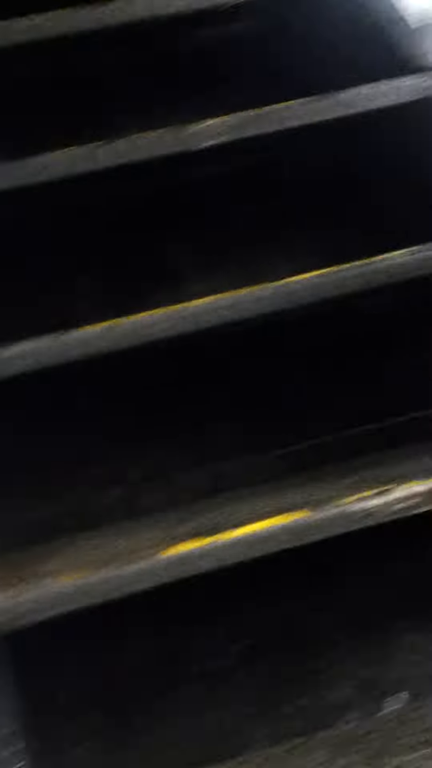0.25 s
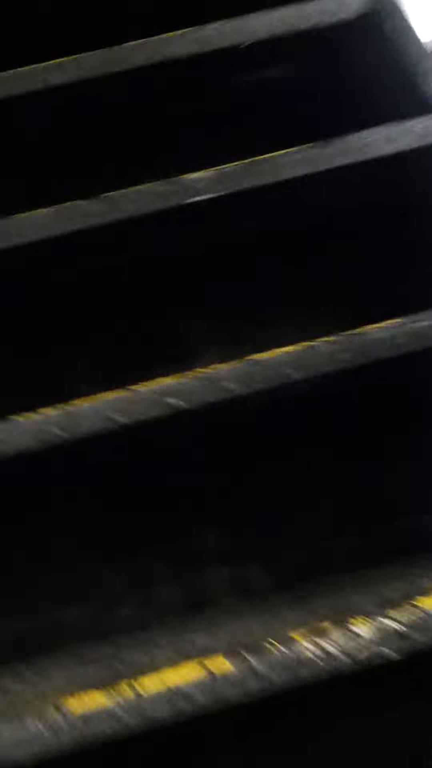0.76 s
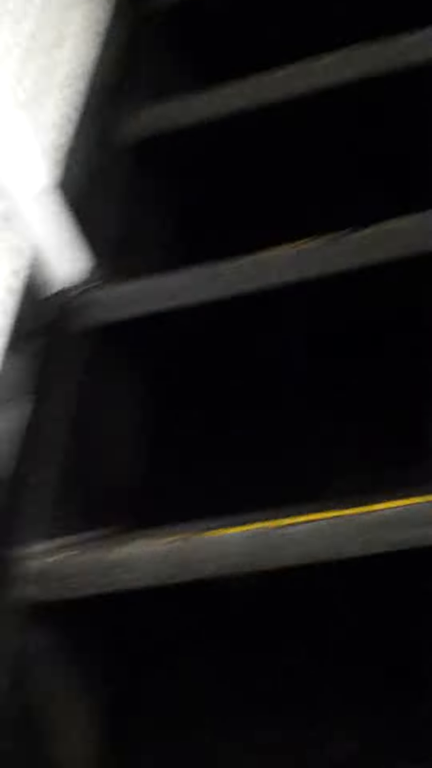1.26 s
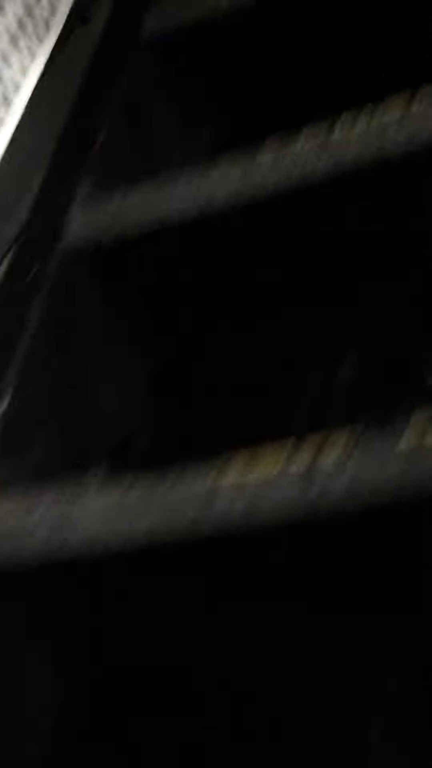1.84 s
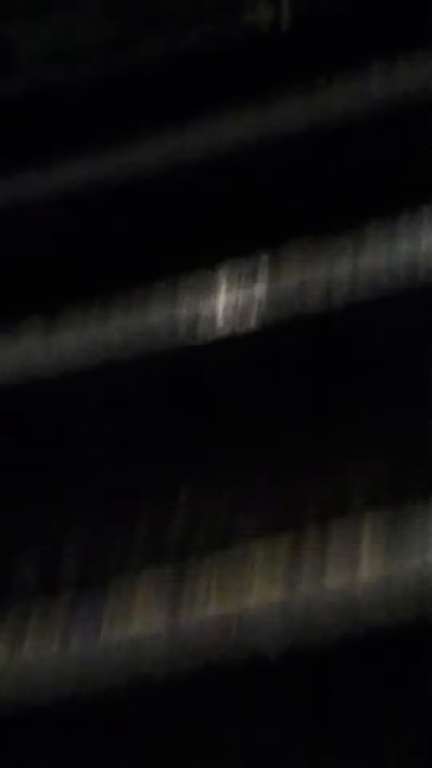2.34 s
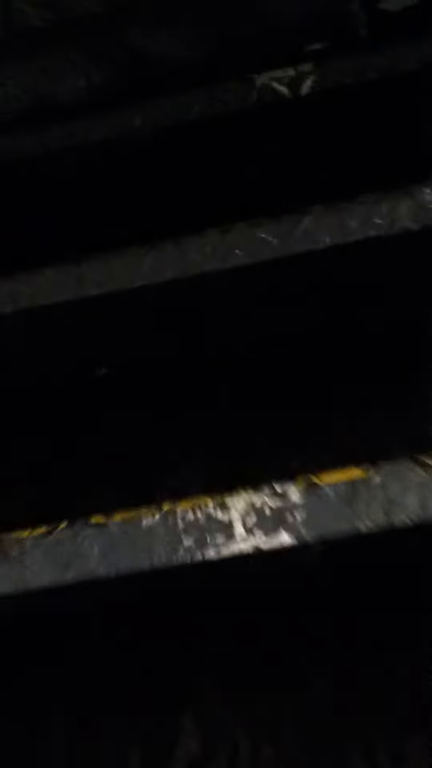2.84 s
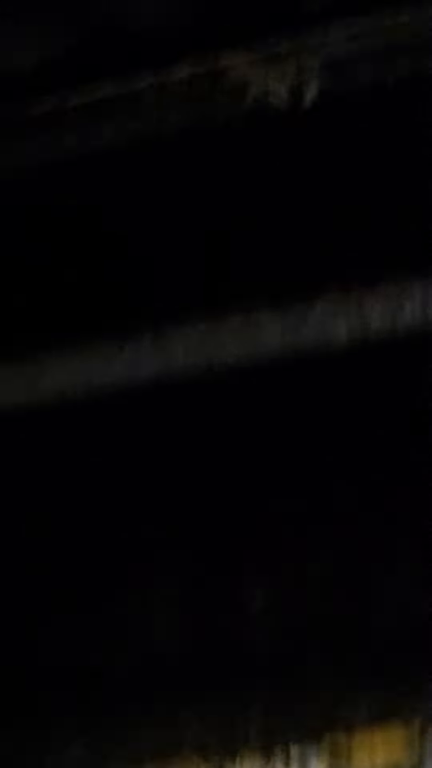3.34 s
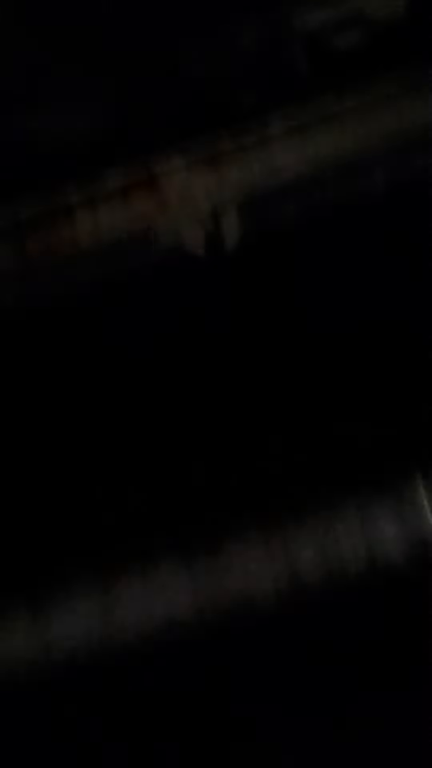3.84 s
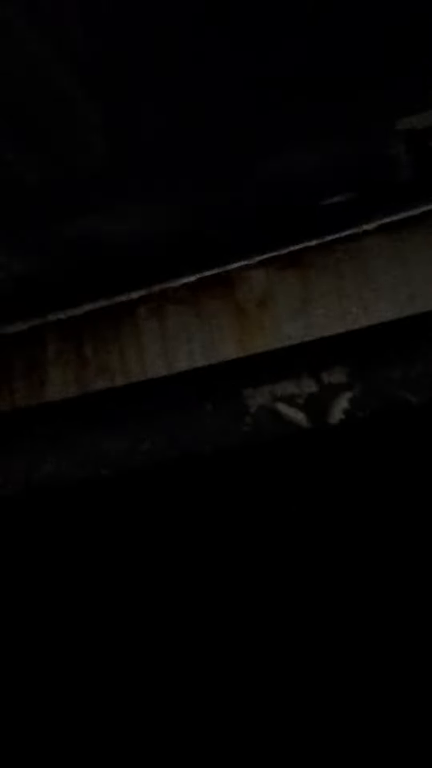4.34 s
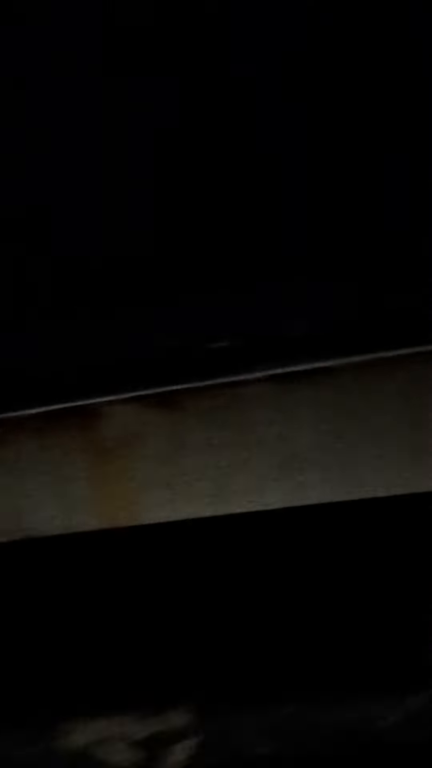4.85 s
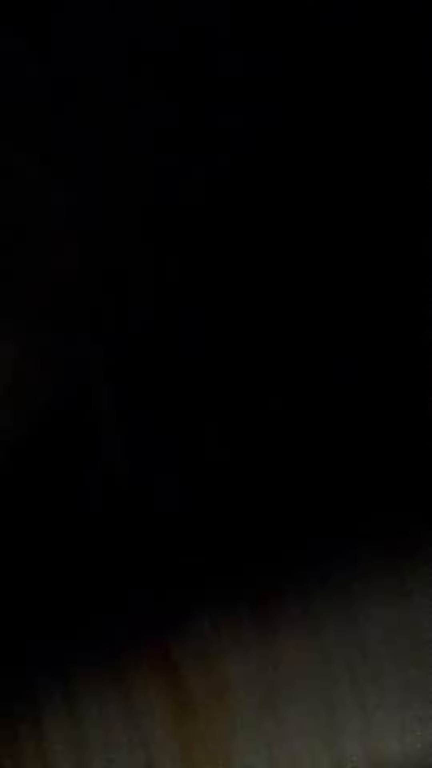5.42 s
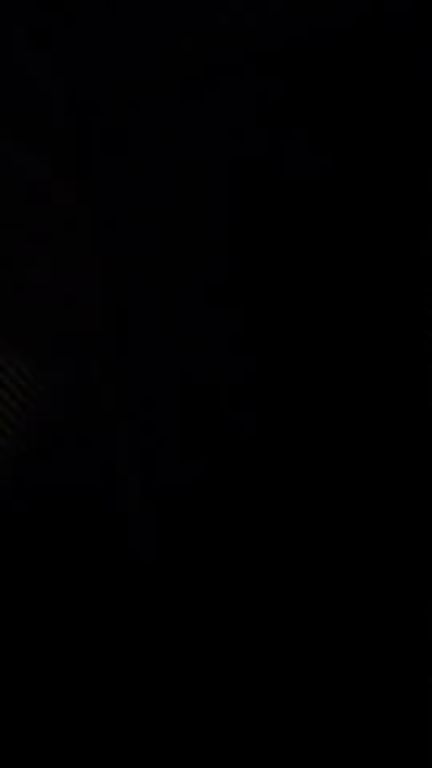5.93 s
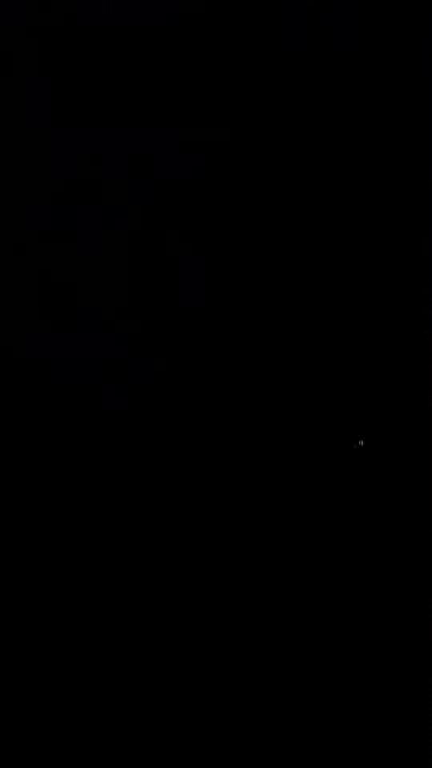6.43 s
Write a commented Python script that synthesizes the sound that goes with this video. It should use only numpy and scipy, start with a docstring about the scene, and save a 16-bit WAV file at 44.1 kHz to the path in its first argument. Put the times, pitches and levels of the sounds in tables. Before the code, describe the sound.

Slow footsteps climb ringing steel stairs on a ship over a low engine drone, with cloth rustle, handling rasps and gritty scuffs.

```python
"""Night climb up a ferry's steel stairs

Someone climbs the stairs with a phone in one hand, over an engine drone of shaft orders and shaped-noise air.
Clothes rustle as dense random slips; a sleeve rasps over the phone, amid dull damped knocks.
Footfalls thud as noise bursts and ring each tread as decaying modes; scuffs crunch and squeak.
Toward the top the fans whine louder, as wavering sines."""
import sys
import numpy as np
from scipy import signal
from scipy.fft import rfft, irfft, next_fast_len
from scipy.io import wavfile
from scipy.ndimage import uniform_filter1d

SR = 44100
rng = np.random.default_rng(int(sys.argv[2]) if len(sys.argv) > 2 else 0)


def transcribe(signal):
    """Save signal, clipped to [-1, 1], as a 16-bit WAV file at the path in sys.argv[1]."""
    frames = np.atleast_2d(signal).T
    limited = np.clip(frames, -1, 1)
    pcm = np.round(limited * 32767).astype(np.int16)
    wavfile.write(sys.argv[1], SR, pcm)


N = 294716
T = np.arange(N) / SR  # time [s]


def undb(db):
    """Decibels to gain."""
    return 10 ** (np.asarray(db) / 20)


def unit(x):
    """Scale to rms 1."""
    return x / np.sqrt(np.mean(x ** 2))


def curve(rows):
    """Join (time [s], value) rows by straight lines."""
    return np.interp(T, *np.transpose(rows))


def colour(x, spectrum):
    """Shape a sound by (frequency [Hz], level [dB]) points, joined over log frequency; rms 1."""
    hz, db = np.transpose(spectrum)
    size = next_fast_len(N)
    f = np.maximum(np.arange(size // 2 + 1) * SR / size, 1)
    gain = undb(np.interp(np.log(f), np.log(hz), db))
    return unit(irfft(rfft(x, size) * gain, size)[:N])


def noise():
    """White noise."""
    return rng.standard_normal(N)


def walk(rate):
    """Random levels held 1 / rate s and slewed twice; spread near 1."""
    k = int(SR / rate)
    held = np.repeat(rng.standard_normal(N // k + 1), k)
    return np.sqrt(2) * uniform_filter1d(uniform_filter1d(held, k), k)[:N]


def tone(hz, waver_hz):
    """A sine whose pitch wavers a little."""
    return np.sin(2 * np.pi * np.cumsum(hz + waver_hz * walk(14)) / SR)


def fade(start, t60, attack):
    """Envelope of a blow: quick rise, exponential decay."""
    age = np.maximum(T - start, 0)
    return (1 - np.exp(-age / attack)) * undb(-60 * np.minimum(age / t60, 2))


def hold(start, end, attack, release):
    """Envelope of a contact: rises, holds to the end time, dies away."""
    return np.clip((T - start) / attack, 0, 1) * np.exp(-np.clip((T - end) / release, 0, 20))


def slide(peak, rise, fall):
    """Envelope of a slide: swells quickly to its peak and dies away."""
    age = T - peak
    return np.exp(-np.minimum(np.where(age < 0, (age / rise) ** 2, age / fall), 20))


# a tread rings sharp at first and sags as it takes the weight: time constant [s]
SAG_S = 0.028


def ring(start, hz, t60, attack, sag=0):
    """One decaying mode; it may begin sharp, by a share of its pitch, and sag to that pitch."""
    age = np.arange(min(int(t60 * SR), N)) / SR
    cycles = hz * (age + sag * SAG_S * (1 - np.exp(-age / SAG_S)))
    level = (1 - np.exp(-age / attack)) * np.exp(-np.log(1000) * age / t60)
    out, first = np.zeros(2 * N), int(np.clip(start * SR, 0, N))
    out[first:first + len(age)] = np.sin(2 * np.pi * cycles) * level
    return out[:N]


def friction(rate, spread_db, grip_db):
    """Dense slips of uneven size, bunched as the contact grips and lets go; rate in slips per second."""
    size = noise() * undb(spread_db * np.minimum(rng.exponential(size=N), 4))
    slips = (rng.random(N) < rate / SR) * size
    return slips * undb(grip_db * walk(170))


def snags(rate, jitter_db, spread_db):
    """A surface catches and lets go: a stuttering run of single clicks, near rate per second."""
    catches = np.floor(np.cumsum(rate * undb(jitter_db * walk(300))) / SR)
    return np.diff(catches, prepend=0) * undb(spread_db * noise())


def reflect(x, t60, wet_db):
    """Close hard surfaces add a dense, short echo that combs the spectrum but keeps its broad colour."""
    age = np.arange(2 * int(SR * t60) + 2) / SR
    tail = rng.standard_normal(len(age)) * np.exp(-np.log(1000) * age / t60)
    echo = unit(tail) / np.sqrt(len(age))
    comb = 1 + undb(wet_db) * rfft(echo)
    comb /= np.sqrt(uniform_filter1d(abs(comb) ** 2, size=41))
    return signal.oaconvolve(x, irfft(comb)[:len(age) // 2])[:N]


# engine shaft rate [turns per second]; level of its fifth order against the fourth [dB]
SHAFT_HZ, FIFTH_DB = 26.82, -14
# the drone's orders swell and dip separately along the stairs:
# (time [s], third order level [dB], fourth order level [dB])
ENGINE_DRONE = [(0, -31.5, -38), (0.699, -34, -45), (1.05, -33.5, -32), (1.65, -33, -31.5),
                (2.25, -32.5, -28.5), (2.6, -32.5, -31.5), (2.9, -29, -25), (3.399, -29.5, -27.5),
                (4.1, -28, -25.5), (4.65, -29, -30), (4.95, -32, -26.5), (5.6, -32.5, -29.5),
                (6.68, -29, -29.5)]
# low hums, and faint high lines near the treads' ringing pitches:
# (frequency [Hz], level before wavering [dB rms])
HUM_LINES = [(47.3, -49.5), (62, -47), (87, -43), (115, -50.5), (480, -46.5), (966, -60.5), (1281, -61.5)]


def engines(turns, hums_follow=0.34, waver=.0016):
    """Orders three to five of one shaft drone together; separate hum lines waver beside them."""
    times, third_db, fourth_db = np.transpose(ENGINE_DRONE)
    third, fourth = np.interp(T, times, third_db), np.interp(T, times, fourth_db)
    drone = hums = 0
    for order, db in zip(range(3, 6), (third, fourth, fourth + FIFTH_DB)):
        wave = np.sin(2 * np.pi * (order * turns + rng.random()))
        drone = drone + undb(db + 0.94 * walk(6.5)) * wave
    for hz, db in HUM_LINES:
        hums = hums + undb(db + 2.1 * walk(3.88)) * tone(hz, 1.0 + waver * hz)
    # the hums partly follow the fourth order's swells and dips
    return np.sqrt(2) * (drone + hums * undb(hums_follow * (fourth - fourth.mean())))


# ventilation and hull rumble: (frequency [Hz], relative level per Hz [dB])
AIR_SPECTRUM = [(25, -29), (40, -16.5), (50, 2), (100, 1), (160, -1.5), (240, -5), (400, -8.5), (650, -9.5),
                (850, -17.5), (1100, -21.5), (1350, -21.5), (2000, -32.5), (2900, -49), (6300, -43),
                (8500, -84.5), (15000, -79)]
# the ventilation opens up near the top of the stairs: (time [s], ventilation and rumble level [dB])
AIR_LEVEL = [(0, -29.5), (1.2, -31), (5.65, -29), (6.05, -28), (6.68, -26.5)]


def ventilation(turns, throb_db=-0.4, order=3):
    """Air and hull rumble; the air flutters, throbs with the engine and rings between the steel walls."""
    roar = colour(noise(), AIR_SPECTRUM)
    rumble = signal.sosfiltfilt(signal.butter(2, 400, fs=SR, output="sos"), roar)
    air = reflect(roar - rumble, t60=0.43, wet_db=-6.0)
    throb = throb_db * np.sin(2 * np.pi * order * turns + walk(15))
    moving_rumble = rumble * undb(walk(8.9))
    moving_air = air * undb(.5 * walk(16) + throb)
    return (moving_rumble + moving_air) * undb(curve(AIR_LEVEL))


# fans on the upper deck: (frequency [Hz], level before the climb's gain [dB rms])
FAN_WHINE = [(453, -44), (791, -59.5), (1238, -60), (1626, -60), (1760, -63), (2196, -61.5)]
# they are screened lower down the stairs: (time [s], gain [dB])
FAN_LEVEL = [(0, -12.5), (5.1, -7.5), (5.55, -3), (6.68, 1.5)]


def deck_fans(waver_hz=2.0, flutter_db=1.0):
    """The upper deck's fans whine in wavering sines that grow louder toward the top of the stairs."""
    whine = sum(undb(db + flutter_db * walk(7.2)) * tone(hz, waver_hz) for hz, db in FAN_WHINE)
    return np.sqrt(2) * whine * undb(curve(FAN_LEVEL))


# colour of the steady rustle: (frequency [Hz], relative level per Hz [dB])
CLOTH_SPECTRUM = [(500, 1.5), (1400, 11.5), (2400, 1.5), (3700, 3.5), (5600, 2.5), (6600, 2.5),
                  (8300, -25.5), (15000, -50.5)]
# clothes moving with the climb: (time [s], level before flutter [dB])
RUSTLE_LEVEL = [(0, -49.5), (.85, -41.5), (1.03, -45.5), (1.2, -52), (1.95, -46.5), (2.14, -45),
                (2.21, -55.5), (2.3, -46.5), (2.55, -48.5), (2.75, -58), (2.92, -48.5), (3.05, -58),
                (3.9, -55.5), (4.15, -44), (4.5, -54.5), (6.68, -53.5)]
# colour of the swishes: (frequency [Hz], relative level per Hz [dB])
SWISH_SPECTRUM = [(800, -10), (2400, -6.5), (3700, 5), (5600, 7), (6800, 7), (8500, -10), (12000, -8.5),
                  (15000, -17.5)]
# swishes of cloth: (time of the peak [s], relative level [dB], rise [s])
CLOTH_SWISHES = [(0.098, -47, 0.015), (0.909, -48.5, 0.018), (1.025, -64, 0.063), (1.48, -74, 0.0039),
                 (1.63, -75, 0.012), (1.960, -45.5, 0.0027), (2.257, -45.5, 0.0084), (2.440, -75, 0.0087),
                 (3.486, -45, 0.016), (4.118, -45, 0.0095), (4.26, -47, 0.0062), (4.754, -54.5, 0.02),
                 (5.255, -47, 0.0062), (5.946, -45.5, 0.0089), (6.11, -42, 0.017), (6.306, -43, 0.0046)]


def clothes(linger=2.43, swish_db=2):
    """Dense slips of cloth rustle through the climb and swish, dying more slowly than they swell."""
    rustle = colour(friction(rate=10000, spread_db=-0.5, grip_db=1.5), CLOTH_SPECTRUM)
    rustle = rustle * undb(curve(RUSTLE_LEVEL) + 3.4 * walk(45))
    weave = colour(friction(rate=9000, spread_db=2.5, grip_db=0.9), SWISH_SPECTRUM)
    swing = sum(undb(db + swish_db) * slide(s, rise, linger * rise) for s, db, rise in CLOTH_SWISHES)
    return rustle + weave * swing


# small dry ticks: (time [s], peak level of the snap [dB], frequency [Hz])
DRY_TICKS = [(0.087, -22.5, 1455), (0.452, -17.5, 3040), (0.644, -7.5, 5130), (0.692, -9.5, 5400),
             (0.714, -10.5, 3200), (0.721, -12, 1680), (2.771, -32, 2180), (2.82, -26, 1450),
             (3.139, -29, 1800), (3.274, -25, 1700), (3.555, -22.5, 784), (6.366, -24, 700),
             (6.422, -22, 646), (6.577, -19, 4400), (6.588, -10, 5700)]
CRACKLE_S = 0.00027  # effective length of a tick's crackle before its gain [s]


def ticks(crackle_db=-8):
    """Each tick is a band-limited snap and a few milliseconds of crackle around the same pitch."""
    out = np.zeros(N)
    for start, db, hz in DRY_TICKS:
        band = signal.butter(3, [hz / 2, min(hz * 1.26, SR / 3)], "band", fs=SR, output="sos")
        # the tiny offset keeps the filter clear of vanishingly small numbers
        snap = signal.sosfilt(band, 1e-18 + (np.arange(N) == int(start * SR)))
        crackle = signal.sosfilt(band, noise() * fade(start, t60=0.0084, attack=0.00038))
        crackle = unit(crackle) * np.sqrt(CRACKLE_S * SR / N)
        out += undb(db) * (snap / abs(snap).max() + undb(crackle_db) * crackle)
    return out


# dull thud, shared by knocks, fumbles and footfalls: (frequency [Hz], relative level per Hz [dB])
THUD_SPECTRUM = [(40, 0.5), (80, 5), (180, 8.5), (350, 1.5), (700, -17), (1500, -27), (4000, -42.5),
                 (12000, -91)]
# dull low knocks, from the hand on the case and from footfalls:
# (time [s], relative level [dB], frequency [Hz])
DULL_KNOCKS = [(0.133, -16.5, 106), (0.141, -17.5, 220), (0.196, -17, 260), (0.241, -13.5, 190),
               (0.255, -20, 480), (0.282, -12, 132), (.301, -15, 375), (0.307, -13.5, 122),
               (0.328, -15, 200), (0.838, -17.5, 223), (5.095, -19, 172), (5.123, -21.5, 130),
               (5.856, -17, 382), (6.364, -14.5, 357), (6.377, -14, 105), (6.413, -17, 131),
               (6.422, -16, 280), (6.546, -9.5, 88.5), (6.581, -15, 184), (6.63, -18, 170),
               (6.67, -16, 221)]


def dull_knocks(cycles=6.6, swell=0.47, thump_db=9, puff_db=-14):
    """Each knock is a damped thump that swells for part of a cycle, and a puff of thud."""
    thud, out = colour(noise(), THUD_SPECTRUM), 0
    for start, db, hz in DULL_KNOCKS:
        thump = ring(start, hz, t60=cycles / hz, attack=swell / hz)
        puff = thud * fade(start, t60=0.1, attack=0.0011)
        out = out + undb(db + thump_db) * thump + undb(db + puff_db) * puff
    return out


def shifting_gap(x, rate, count):
    """The gap between cloth and case keeps changing: its short echo glides from one colour to the next."""
    out = 0
    for k in range(count):
        share = np.maximum(np.cos(2 * np.pi * (rate * T - k) / count), 0)
        out = out + share * reflect(x, t60=0.036, wet_db=1.5)
    return unit(out)


# the sleeve brushes the phone, drags hard across it and scrapes off; one curve per stroke:
# (time [s], relative rasp level [dB], relative level of the case's body [dB])
SLEEVE_RUBS = [
    [(0.162, -33, -46), (0.178, -30.5, -28), (0.235, -33.5, -31), (0.362, -44, -48), (0.43, -42, -53)],
    [(0.453, -25, -19), (0.467, -21, -23), (0.482, -24, -26.5), (0.497, -23, -25), (0.503, -22.5, -30),
     (0.517, -21, -29.5), (0.529, -27.5, -26.5), (0.54, -26, -21.5), (0.555, -19.5, -22.5),
     (0.577, -27, -18.5), (0.61, -25, -27.5), (0.637, -31.5, -25), (0.648, -25.5, -28.5),
     (0.657, -29.5, -26), (0.683, -29.5, -30.5)],
    [(0.688, -27.5, -35), (0.694, -20, -31.5), (0.703, -27.5, -34), (0.711, -23, -33)],
    [(0.714, -17.5, -35), (0.722, -16.5, -36), (0.729, -20.5, -38), (0.739, -19.5, -45),
     (0.751, -23.5, -41.5), (0.795, -33, -37), (0.81, -30, -46), (0.826, -34.5, -26), (0.835, -42, -42)],
]
# rasp of the sleeve: (frequency [Hz], relative level per Hz [dB])
SLEEVE_SPECTRUM = [(500, -17), (1000, -1), (1400, -2.5), (2000, -8.5), (2700, -8), (3700, -3), (4600, -5),
                   (5700, -2.5), (6600, -5.5), (8500, -19.5), (12000, -20.5), (15000, -35)]
# the sleeve's zing glides up and down in pitch: (time [s], centre before jitter [Hz])
ZING_PITCH = [(.47, 4960), (.515, 3696), (.555, 5350), (.61, 4500), (.695, 5720), (.73, 5400), (.745, 6060),
              (.83, 4260)]
# body of the shaken case: (frequency [Hz], relative level per Hz [dB])
CASE_SPECTRUM = [(30, -10), (60, 5), (220, -0.5), (480, -6.5), (750, -5), (1000, -15), (1400, -8.5),
                 (2400, -16.5), (5000, -72)]
# a harder rub is brighter: rasp level of unchanged treble, dB of treble per dB of rasp, lowest treble gain
BRIGHT_AT_DB, TREBLE_PER_DB, DULLEST_DB = -19.5, 0.55, -8.5


def sleeve(attack=0.0018, release=0.0093, case_db=3.0, snag_db=-3.0, zing_db=-4, zing_width_hz=900):
    """Slips and snags rasp over the phone and shake its case; a narrow zing glides up and down in pitch."""
    slips = colour(friction(rate=3200, spread_db=1.9, grip_db=0.5), SLEEVE_SPECTRUM)
    slips = shifting_gap(slips, rate=20.16, count=4)
    slips = slips + undb(snag_db) * colour(snags(rate=260, jitter_db=4, spread_db=0.0), SLEEVE_SPECTRUM)
    treble = signal.sosfiltfilt(signal.butter(2, 4300, "high", fs=SR, output="sos"), slips)
    shake = colour(friction(rate=4500, spread_db=2.0, grip_db=-1.0), CASE_SPECTRUM)
    # slow noise times a gliding sine makes a narrow band of zing
    blur = unit(signal.sosfilt(signal.butter(2, zing_width_hz / 2, fs=SR, output="sos"), noise()))
    zing_cycles = np.cumsum(curve(ZING_PITCH) * (1 + 0.048 * walk(400))) / SR
    zing = undb(zing_db) * blur * np.sqrt(2) * np.sin(2 * np.pi * zing_cycles)
    grip_db, out = 1.5 * walk(220), 0
    for rub in SLEEVE_RUBS:
        times, rasp, body = np.transpose(rub)
        rasp, body = np.interp(T, times, rasp), np.interp(T, times, body)
        treble_db = np.maximum(TREBLE_PER_DB * (rasp - BRIGHT_AT_DB), DULLEST_DB)
        scrape = slips + (undb(treble_db) - 1) * treble + undb(treble_db) * zing
        stroke = undb(rasp + grip_db) * scrape + undb(body + case_db) * shake
        out = out + stroke * hold(times[0], times[-1], attack, release)
    return out


# fingers shifting their grip, a tumble of small knocks: (start [s], length [s], level [dB])
GRIP_FUMBLES = [(0.167, .16, -24.5), (5.932, .28, -31), (6.61, .1, -23)]


def fumbles():
    """Fingers shift on the case in a run of soft, random knocks."""
    knocks = colour(friction(rate=600, spread_db=2.5, grip_db=3.0), THUD_SPECTRUM)
    level = 0
    for start, length, db in GRIP_FUMBLES:
        level = level + undb(db) * hold(start, start + length, attack=0.034, release=0.018)
    return knocks * level


# footfalls: (time [s], thud level [dB], relative tread ring level [dB], pitch of that tread's boom [Hz],
# boom level [dB], centre it rings most around [Hz], its own lingering note [Hz], note level [dB])
FOOTFALLS = [(1.241, -33.5, -47, 238, -36.5, 500, 494, -32),
             (2.106, -20.5, -31.5, 203, -43, 1400, 651, -36.5),
             (2.829, -22, -30.5, 291.3, -29, 1710, 1257, -43),
             (3.554, -25.5, -32, 181, -33, 640, 501, -30.5), (4.318, -25, -28.5, 253, -22.5, 900, 967, -35),
             (5.05, -23.5, -36.5, 323.5, -22, 350, 639, -42),
             (5.856, -23, -37, 258, -27.5, 1420, 476.4, -31), (6.576, -21.5, -60, 255, -30, 504, 520, -41)]
# steel tread: (frequency before detuning [Hz], relative level [dB], t60 [s])
TREAD_MODES = [(350, 6, 0.55), (449.5, 1, 0.31), (520, 8.5, 0.27), (589, 0.5, 0.26), (666, -4, 0.37),
               (706, 0.5, 0.9), (720, -2.5, 0.69), (961, -11, 1.9), (1070, -13.5, 0.25), (1147, -1.5, 0.16),
               (1210, -2.5, 0.3), (1282, -14.5, 2.1), (1645, -17.5, 0.18), (1980, -9.5, 0.25),
               (2540, -10.5, 0.23)]
# the tread's many short-lived higher modes blur into a clang: (frequency [Hz], relative level per Hz [dB])
CLANG_SPECTRUM = [(200, -24.5), (450, -4), (700, 6.5), (1100, 5.5), (1400, -18), (2500, -16), (6000, -60)]
SAG = 0.0487  # how sharp a tread starts, as a share of its pitch


def footsteps(settle_s=0.036, settle_db=-6, clang_db=-6, own_t60=0.95):
    """A soft sole thuds and settles; the steel clangs, ringing most in modes near each step's centre."""
    thud, clang, out = colour(noise(), THUD_SPECTRUM), colour(noise(), CLANG_SPECTRUM), np.zeros(N)
    for start, thud_db, ring_db, boom_hz, boom_db, centre_hz, note_hz, note_db in FOOTFALLS:
        landing = fade(start, t60=0.19, attack=0.00087)
        settling = undb(settle_db) * fade(start + settle_s, t60=0.27, attack=0.00085)
        out += undb(thud_db) * thud * (landing + settling)
        out += undb(ring_db + clang_db) * clang * fade(start, t60=0.31, attack=0.0044)
        out += undb(boom_db) * ring(start, boom_hz, t60=0.5, attack=0.0047, sag=SAG)
        out += undb(note_db) * ring(start, note_hz, t60=own_t60, attack=0.01)
        for (hz, db, t60), detune in zip(TREAD_MODES, rng.standard_normal(len(TREAD_MODES))):
            missed_db = 5 * abs(np.log2(hz / centre_hz))  # 5 dB weaker per octave off centre
            mode = ring(start, hz * (1 + 0.0026 * detune), t60, attack=0.011, sag=SAG)
            out += undb(ring_db + db - missed_db) * mode
    return out


# scuffs and zipping swishes, most just after a footfall: (time of the peak [s], relative level [dB],
# rise [s], pitch the squeak bends around [Hz], squeak level before scuff level [dB], crunch level [dB])
SCUFF_EVENTS = [(2.120, -54.5, 0.011, 5600, 11.5, -41), (2.849, -37.5, 0.017, 4470, -3, -32.5),
                (3.576, -37, 0.014, 5000, -18, -39), (4.335, -37, 0.015, 4400, -4, -41.5),
                (5.07, -30.5, 0.0072, 5270, -4.5, -38.5), (5.875, -43, 0.0087, 5180, 5.5, -39),
                (6.01, -32, 0.018, 5400, -5.5, -52), (6.583, -25.5, 0.0094, 4920, -5, -39)]
# rasp of the scuff: (frequency [Hz], relative level per Hz [dB])
SCUFF_SPECTRUM = [(300, -3), (1200, -3.5), (2300, -2.5), (3600, 9), (5200, 13.5), (6400, 8.5), (8500, -9.5),
                  (11500, -13), (15000, -35)]
# crushed grit: (frequency [Hz], relative level per Hz [dB])
CRUNCH_SPECTRUM = [(400, 3), (900, 9), (1300, 6), (1700, -2.5), (2300, 5), (3500, -6), (6000, -12),
                   (12000, -64)]
# the squeak is a run of falling zips: typical rate before jitter, fall of each [octaves]
ZIPS_PER_S, ZIP_OCTAVES = 150, 0.79
# a fainter drag follows: level against the scuff [dB], decay [s]
DRAG_DB, DRAG_S = -13, 0.038


def scuffs(grit_db=-2, crunch_fall=0.018):
    """Each scuff crunches, rasps, squeaks in falling zips and drags on, with its own short echo."""
    grit = colour(friction(rate=2500, spread_db=3.0, grip_db=2.0), SCUFF_SPECTRUM)
    crunch = colour(snags(rate=450, jitter_db=5, spread_db=9.0), CRUNCH_SPECTRUM)
    zips = np.cumsum(ZIPS_PER_S * undb(2.3 * walk(120))) / SR % 1  # progress through each zip
    bend = 2 ** (ZIP_OCTAVES * (.5 - zips) + 0.055 * walk(2600))
    travel = np.cumsum(bend) / SR
    squeeze = undb(3.7 * walk(300)) / bend  # louder as the pitch falls
    catch = undb(2.3 * walk(90))
    out = 0
    for start, db, rise, hz, squeak_db, crunch_db in SCUFF_EVENTS:
        squeak = undb(squeak_db) * squeeze * np.sin(2 * np.pi * hz * travel)
        contact = slide(start, rise, fall=0.012) + undb(DRAG_DB) * catch * slide(start, rise, DRAG_S)
        scuff = undb(db) * (undb(grit_db) * grit + squeak) * contact
        crushed = undb(crunch_db) * crunch * slide(start, rise, crunch_fall)
        out = out + reflect(scuff + crushed, t60=0.025, wet_db=1)
    return out


def scene():
    """Everything reaches one microphone; one wavering shaft drives the drone and the air's throb."""
    turns = np.cumsum(SHAFT_HZ * (1 + 0.0025 * walk(3.97))) / SR
    ship = engines(turns) + ventilation(turns) + deck_fans()
    handling = ticks() + dull_knocks() + sleeve() + fumbles()
    return (ship + clothes() + handling + footsteps() + scuffs())[None]


def record(dry, ceiling=0.46, top_hz=15800):
    """The phone drops the deepest bass, rounds the loudest peaks and cuts the top."""
    thin = signal.sosfilt(signal.butter(5, 38, "high", fs=SR, output="sos"), dry)
    rounded = ceiling * np.tanh(thin / ceiling)
    return signal.sosfilt(signal.ellip(10, .2, 70, top_hz, fs=SR, output="sos"), rounded)


dry = scene()
out = record(dry)
transcribe(out)
```